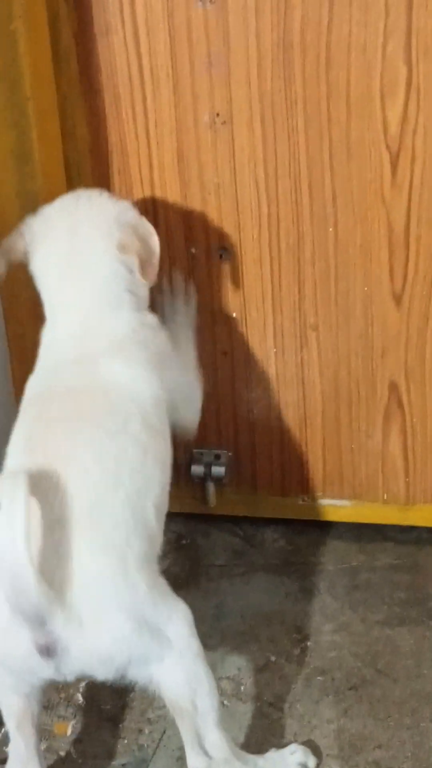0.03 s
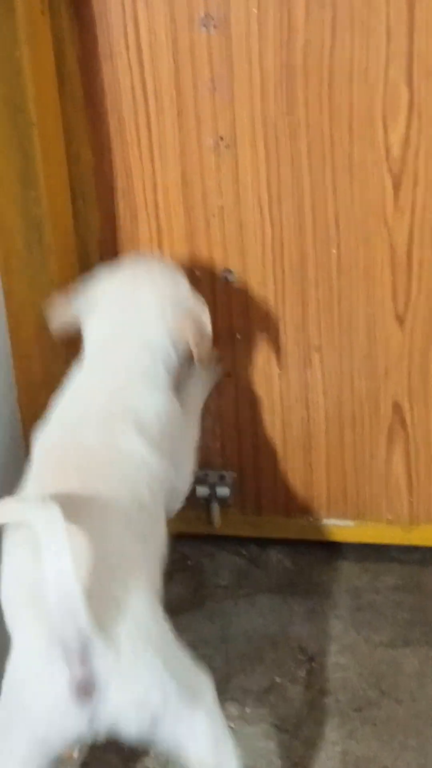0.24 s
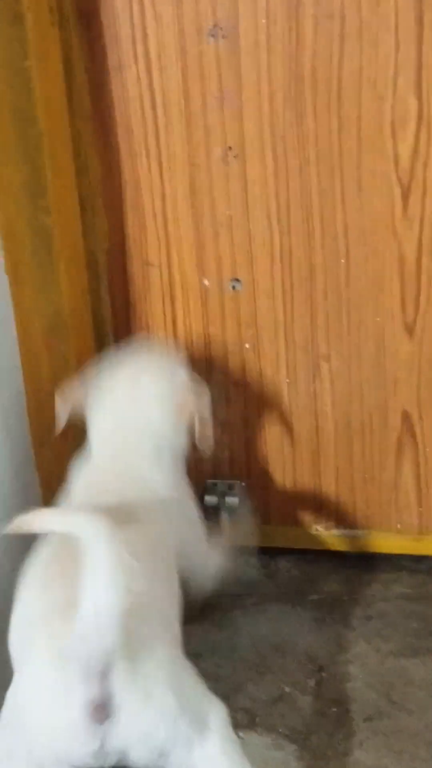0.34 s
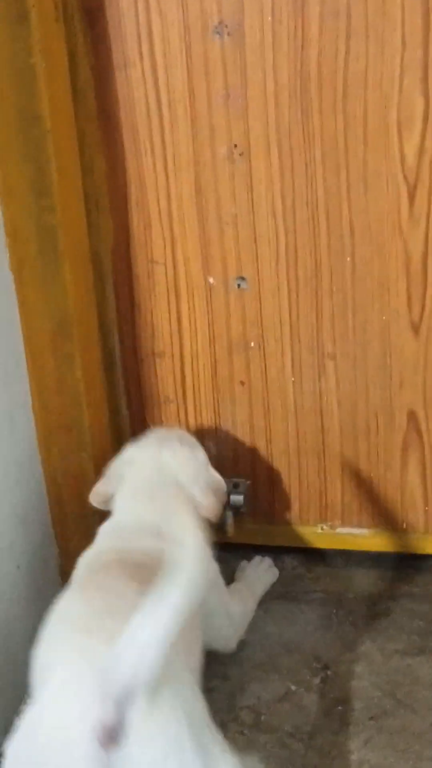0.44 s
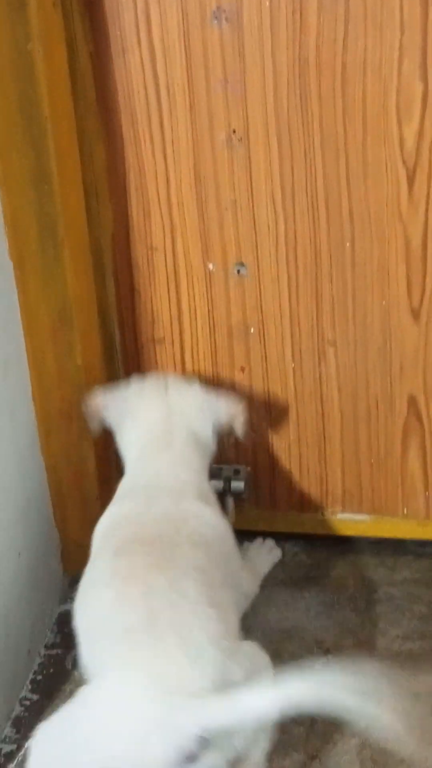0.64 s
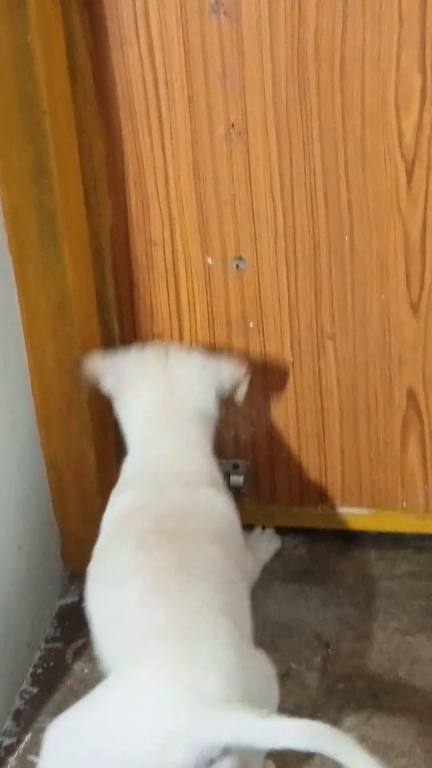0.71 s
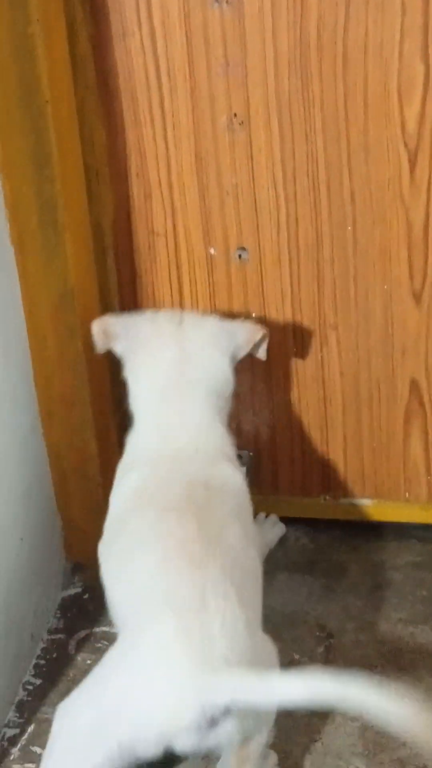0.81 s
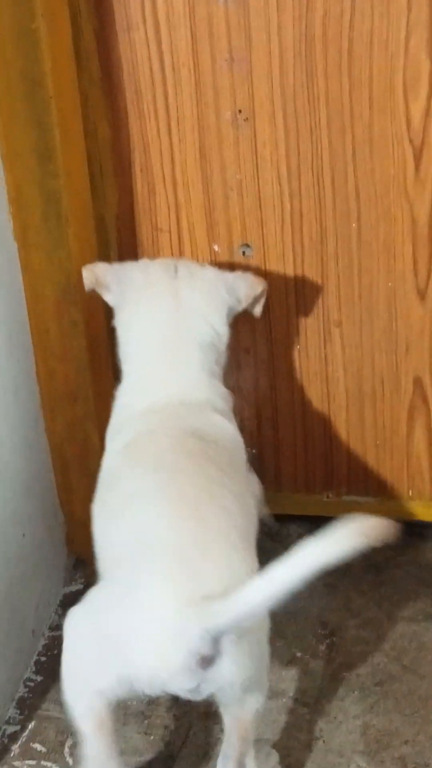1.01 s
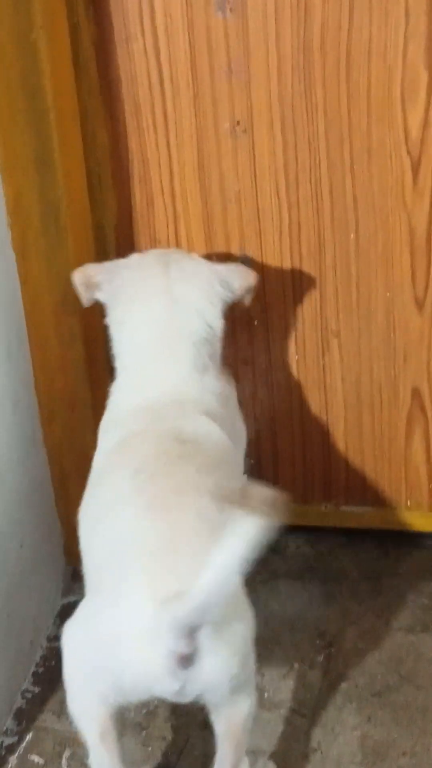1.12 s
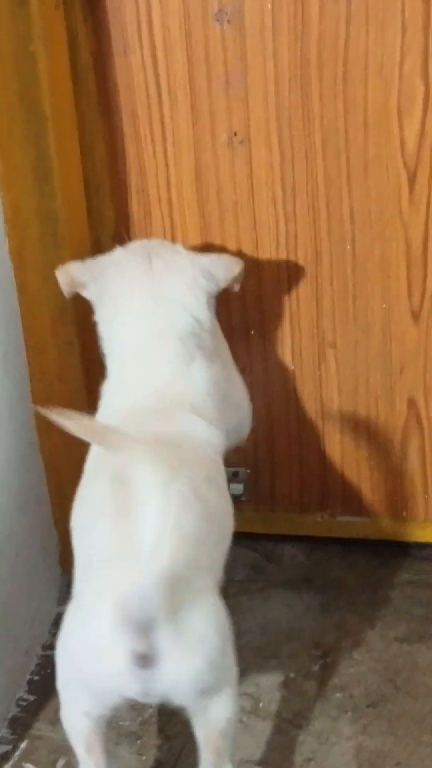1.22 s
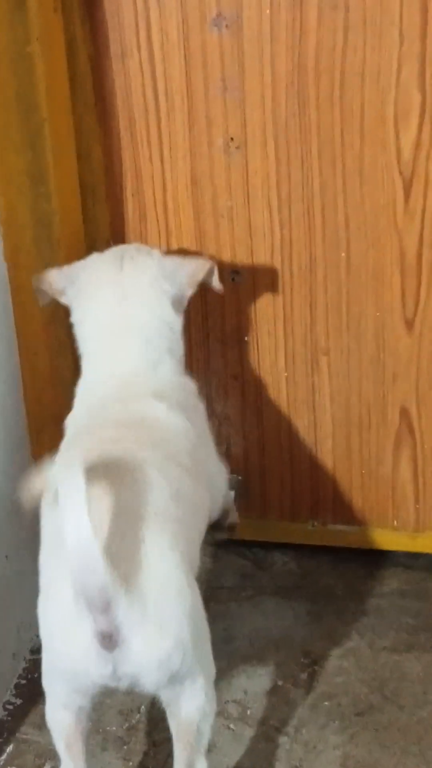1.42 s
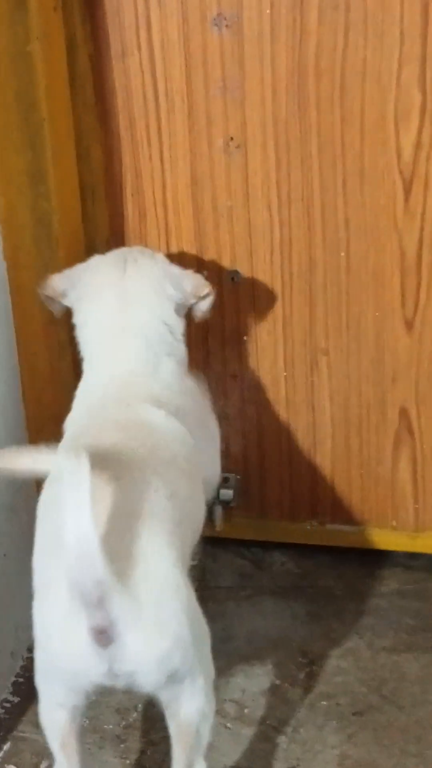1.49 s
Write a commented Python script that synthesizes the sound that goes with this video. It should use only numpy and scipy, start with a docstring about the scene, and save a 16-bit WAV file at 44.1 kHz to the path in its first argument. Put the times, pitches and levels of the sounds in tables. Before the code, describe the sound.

A puppy paws at a wooden door, claws ticking and rasping over soft thuds. The door knocks loudly against its bolt, then the scratching fades, pauses and resumes softly. Heard close up in a small, hard room.

```python
"""Puppy pawing at a door

In a small, hard room a puppy paws at a wooden door: claw tips tick, skidding claws rasp, pads thud
and rub, and the panel booms under its weight. As the paws slide down, the door knocks loudly against
its bolt, with light steel chinks. A claw skids on the floor; after a pause the pawing resumes softly."""
import sys
import numpy as np
from scipy import signal
from scipy.fft import rfft, irfft, next_fast_len
from scipy.io import wavfile
from scipy.ndimage import map_coordinates

SR = 44100
rng = np.random.default_rng(int(sys.argv[2]) if len(sys.argv) > 2 else 0)


def output_pcm(signal):
    """Save a mono or channel-first signal as 16-bit PCM at the path in sys.argv[1].

    Samples are clipped to [-1, 1] before scaling.
    """
    pcm = np.clip(np.atleast_2d(signal).T, -1, 1) * 32767
    wavfile.write(sys.argv[1], SR, np.round(pcm).astype(np.int16))


N = 68355  # 1.55 s


def amp(db):
    """Decibels to gain."""
    return 10 ** (np.asarray(db) / 20)


def unit(x):
    """x scaled to rms 1."""
    return x / np.sqrt(np.mean(x ** 2) + 1e-20)


def along(points, hz):
    """Read (Hz, value) points along a log frequency axis."""
    freqs, values = np.transpose(points)
    return np.interp(np.log(hz + 1), np.log(freqs + 1), values)


def curve(points):
    """Join (s, value) points into one value per sample."""
    return np.interp(np.arange(N) / SR, *np.transpose(points))


def wobble(rate_hz):
    """A smooth random curve with rate_hz knots a second."""
    return map_coordinates(rng.standard_normal(256), [np.arange(N) * rate_hz / SR], mode="wrap")


def peak(hz, centre_hz, width_hz):
    """Gain of one resonance."""
    return 1 / np.sqrt(1 + (2 * (hz - centre_hz) / width_hz) ** 2)


def coloured(x, gain):
    """EQ x by gain(hz), minimum phase so that nothing rings ahead of an attack."""
    size = 2 * next_fast_len(len(x))
    hz = np.fft.rfftfreq(size, 1 / SR)
    cepstrum = irfft(np.log(np.maximum(gain(hz), 1e-6)), size)
    cepstrum[1:size // 2] *= 2
    cepstrum[size // 2 + 1:] = 0
    return irfft(rfft(x, size) * np.exp(rfft(cepstrum)), size)[:len(x)]


def grit(size, spread_db):
    """Stick-slip grains: tiny impulses of uneven size."""
    noise, strength = rng.standard_normal((2, size))
    return unit(noise * amp(spread_db * np.clip(strength, -2, 2)))


def contact(rise_s, fall_s, spread_db, gain):
    """A coloured burst of grains that rises and dies away, near rms 1 over its main part."""
    t = np.arange(SR // 8) / SR
    envelope = np.minimum(t / rise_s, 1) * np.exp(-np.maximum(t - rise_s, 0) / fall_s)
    burst = coloured(envelope * grit(len(t), spread_db), gain)
    return burst * np.sqrt((rise_s + fall_s) * SR / np.sum(burst ** 2))


def add(track, start_s, sound):
    """Mix a sound into the track at start_s."""
    part = track[max(round(start_s * SR), 0):][:len(sound)]
    part += sound[:len(part)]


def claw_taps():
    """Each claw tip strikes the wood with a hard tick and a brief ring."""
    taps = [(0.0334, -28, 4570), (.128, -29, 4700), (.197, -38, 4620), (0.2208, -23, 4180),
            (.233, -20, 4460), (.307, -27.5, 4900), (.405, -17.5, 4800), (.4538, -15.5, 4650),
            (.459, -23, 4870), (.475, -28, 4600), (.485, -24.5, 5300), (.621, -42.5, 4640),
            (1.332, -49, 3800), (1.347, -43, 4150), (1.368, -49, 4200), (1.409, -41.5, 4440),
            (1.412, -45.5, 2740)]  # claw strikes: start_s, level_db, ring_hz
    tick_eq = [(200, -18), (900, -9.5), (2200, -4.5), (3200, -8), (5300, -3), (6200, -7.5), (10500, -16.5),
               (12000, -37)]  # tone of a tick: freq_hz, gain_db
    ring_db = 16
    out = np.zeros(N)
    for start_s, level_db, ring_hz in taps:
        ring = lambda hz: 1 + amp(ring_db) * peak(hz, ring_hz, width_hz=450)
        tone = lambda hz: amp(along(tick_eq, hz)) * ring(hz)
        tick = contact(rise_s=0.00059, fall_s=0.0023, spread_db=2, gain=tone)
        add(out, start_s, amp(level_db) * tick)
    return in_room(out, wet_db=-4)


def claw_scrapes():
    """A claw skidding over wood, metal or floor chatters in a short, bright rasp."""
    skids = [(0.023, 0.0097, -41, 7740), (.053, 0.013, -37, 8300), (0.061, 0.031, -40, 8200),
             (0.224, 0.013, -36.5, 8050), (0.296, 0.032, -39.5, 5200), (.375, .0024, -34, 9350),
             (0.396, 0.029, -38, 8650), (0.436, 0.0045, -30, 12800), (0.443, 0.024, -25.5, 9000),
             (0.4535, 0.0024, -23.5, 9000), (.458, 0.0035, -13.5, 6970), (0.4609, 0.0036, -17, 10100),
             (0.473, 0.0025, -21, 10000), (0.486, 0.0035, -25, 8550), (.559, 0.0055, -34.5, 7000),
             (.683, .039, -51.5, 12200), (0.763, 0.02, -44, 12700), (.771, 0.006, -37.5, 10400),
             (0.784, 0.006, -43.5, 12200), (0.806, 0.0052, -46, 10500), (1.024, 0.013, -62.5, 10900),
             (1.288, 0.018, -54, 7700), (1.3, .022, -43.5, 7700), (1.336, 0.014, -43.5, 10760),
             (1.412, 0.0082, -46, 7850), (1.479, 0.019, -49.5, 8300)]  # claw skids: start_s, length_s, level_db, bright_hz
    rasp_eq = [(300, 0.5), (3000, -15.5), (5000, -3.5), (7000, 0.5), (10700, -1.5), (11800, -6.5)]  # tone of a rasp: freq_hz, gain_db
    out = np.zeros(N)
    for start_s, length_s, level_db, bright_hz in skids:
        edge = lambda hz: 1 + amp(16) * peak(hz, bright_hz, width_hz=1800)
        tone = lambda hz: amp(along(rasp_eq, hz)) * wood(hz) * edge(hz)
        rasp = contact(rise_s=0.34 * length_s, fall_s=0.4 * length_s, spread_db=7.5, gain=tone)
        add(out, start_s, amp(level_db) * rasp)
    return in_room(out, wet_db=-8)


def pad_thuds():
    """Soft pads land in woody bumps, mostly on the door and once on the floor, some low and dull, some higher."""
    landings = [(.062, -40.5, 200), (.136, -32, 427), (.185, -41, 140), (.24, -37.5, 1000),
                (.313, -30, 600), (.418, -30, 660), (0.4544, -30.5, 795), (.481, -35.5, 850),
                (.548, -39, 144), (1.25, -57, 310), (1.404, -51, 646), (1.428, -47.5, 600),
                (1.538, -49, 1000)]  # pad landings: start_s, level_db, centre_hz
    thud_eq = [(40, -6), (140, 4), (230, -2.5), (400, 0.5), (550, -4), (720, -0.5), (1000, -1.5),
               (1400, -7), (6000, -9.5), (16000, -30)]  # tone of a bump: freq_hz, gain_db
    out = np.zeros(N)
    for start_s, level_db, centre_hz in landings:
        tone = lambda hz: amp(along(thud_eq, hz)) * wood(hz) * peak(hz, centre_hz, 2 * centre_hz)
        bump = contact(rise_s=0.0017, fall_s=0.013, spread_db=1.5, gain=tone)
        add(out, start_s, amp(level_db) * bump)
    return in_room(out, wet_db=-3)


def paw_drag():
    """Paws rub unevenly along the grain, sticking and slipping."""
    rub_levels = [(0, -43), (.11, -45), (.21, -44), (.26, -35), (.44, -36), (.52, -50), (.61, -44),
                  (.71, -50.5), (.76, -58), (.9, -65.5), (1.25, -66), (1.32, -55.5), (1.39, -58),
                  (1.45, -53.5), (1.55, -59)]  # strength of the rubbing: time_s, level_db
    rub_eq = [(60, -10), (160, 9.5), (230, 1.5), (500, -1), (2000, 2), (3300, -3), (5000, 0.5),
              (6200, -4.5), (8000, -5), (10500, -11), (12000, -19.5), (15500, -17)]  # tone of the rubbing: freq_hz, gain_db
    flutter_db = 2.57 * wobble(rate_hz=170)
    grains = grit(N, spread_db=7.5) * amp(curve(rub_levels) + flutter_db)
    rub = coloured(grains, lambda hz: amp(along(rub_eq, hz)) * wood(hz))
    return in_room(unit(rub) * np.std(grains), wet_db=-8)  # the EQ leaves the level alone


def door_knocks():
    """The loose door clacks against its bolt and frame and fills the room."""
    knocks = [(.002, -41), (.223, -33.5), (.234, -32.5), (.418, -28), (0.4607, -18.5), (.481, -26.5),
              (1.405, -48), (1.539, -53.5)]  # door hits: start_s, level_db
    knock_eq = [(100, -13.5), (600, -17.5), (1000, -9), (1250, -6), (1600, 0), (2350, -1), (2750, -2.5),
                (3300, -14.5), (5300, -23), (8000, -29), (16000, -51)]  # tone of a clack: freq_hz, gain_db
    tone = lambda hz: amp(along(knock_eq, hz)) * wood(hz)
    out = np.zeros(N)
    for start_s, level_db in knocks:
        clack = contact(rise_s=0.0016, fall_s=0.0076, spread_db=1.5, gain=tone)
        add(out, start_s, amp(level_db) * clack)
    return in_room(out, wet_db=-1)


def panel_boom():
    """The panel's lowest modes swell and go sharp under the puppy's weight, wavering slightly."""
    boom_levels = [(0, -54), (.12, -53), (.19, -42), (.25, -34.5), (.34, -41), (.39, -36), (.52, -32),
                   (.6, -40), (.68, -40.5), (.75, -44.5), (.83, -68), (.9, -59), (1.25, -76), (1.43, -54.5),
                   (1.51, -42.5), (1.55, -42)]  # swell of the pushed panel: time_s, level_db
    panel_modes = [(43, -11), (63, 1.5), (105, -9.5), (132, -11)]  # bending modes: pitch_hz, relative_db
    stiffening = 0.1107  # fractional pitch rise at the heaviest push
    push = amp(curve(boom_levels))
    warped_s = np.cumsum(1 + stiffening * push / push.max()) / SR
    boom = np.zeros(N)
    for pitch_hz, relative_db in panel_modes:
        strength = amp(relative_db + wobble(rate_hz=20))
        phase = 2 * np.pi * pitch_hz * warped_s + 0.3 * wobble(rate_hz=12)
        boom += strength * np.sin(phase)
    return push * unit(boom)


def wood(hz):
    """Gain of the door's resonances, which colour the scrapes, thuds, rubbing and knocks."""
    wood_modes = [(1174, 26, -9.5), (1533, 130, -5.5), (2684, 160, -10.5), (5450, 110, -15),
                  (10200, 620, -2)]  # door resonances: centre_hz, width_hz, gain_db
    return 1 + sum(amp(db) * peak(hz, centre, width) ** 2 for centre, width, db in wood_modes)


def bolt_chinks():
    """The steel bolt shakes in light, broken chinks."""
    chinks = [(.099, -40), (.183, -45), (.312, -37), (1.306, -37.5), (1.313, -40), (1.34, -43),
              (1.375, -50), (1.417, -48)]  # bolt rattles: start_s, level_db
    steel_modes = [(6940, 720, -7), (8050, 260, 1.5), (10880, 300, -8)]  # steel resonances: centre_hz, width_hz, gain_db
    steel = lambda hz: sum(amp(db) * peak(hz, centre, width) ** 2 for centre, width, db in steel_modes)
    out = np.zeros(N)
    for start_s, level_db in chinks:
        chink = contact(rise_s=0.001, fall_s=0.0064, spread_db=3.5, gain=steel)
        add(out, start_s, amp(level_db) * chink)
    return in_room(out, wet_db=-6)


def in_room(x, wet_db):
    """x plus the short tail of hard walls, each frequency dying at its own speed."""
    decay_times = [(100, 0.58), (500, 0.37), (2000, 0.45), (4000, 0.34), (10000, 0.41), (16000, 0.27)]  # time for the room to fall 60 dB: freq_hz, decay_s
    hz, t, noise = signal.stft(rng.standard_normal(SR * 2 // 3), SR, nperseg=256)
    decay = amp(-60 * t / along(decay_times, hz)[:, None])
    tail = signal.istft(noise * decay, SR, nperseg=256)[1]
    tail *= 1 - np.exp(-np.arange(len(tail)) / SR / 0.0022)  # reflections build up
    return x + amp(wet_db) * signal.fftconvolve(x, tail / np.linalg.norm(tail))[:N]


def room_air():
    """Quiet, steady room tone: a low rumble with faint hiss."""
    air_eq = [(25, -37), (61, -8), (160, -9), (240, -20), (330, -13.5), (520, -19.5), (1020, -22.5),
              (1600, -27.5), (3600, -32.5), (6300, -25), (7600, -34), (10600, -30), (12000, -41)]  # tone of the still room: freq_hz, gain_db
    air = coloured(rng.standard_normal(N), lambda hz: amp(along(air_eq, hz)))
    return amp(-58) * unit(air)


def scene():
    """Paws, door and room tone, heard close up in mono."""
    paws = claw_taps() + claw_scrapes() + pad_thuds() + paw_drag()
    door = door_knocks() + bolt_chinks() + panel_boom()
    return (paws + door + room_air())[None]


def record(dry):
    """A brick-wall low-pass takes off the very top of the treble."""
    top_hz = 15600
    size = next_fast_len(N + SR // 4)
    passband = np.fft.rfftfreq(size, 1 / SR) < top_hz
    return irfft(rfft(dry, size) * passband, size)[:, :N]


dry = scene()
out = record(dry)
output_pcm(out)
```